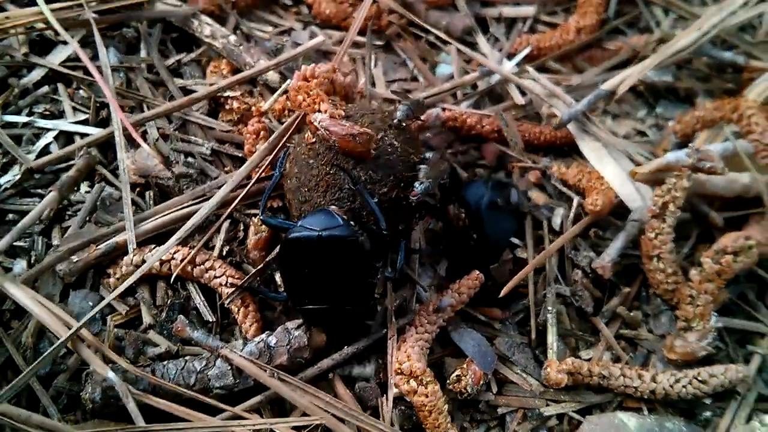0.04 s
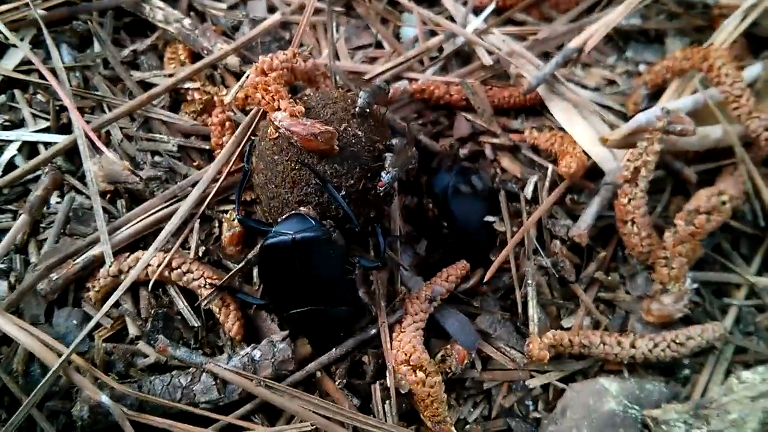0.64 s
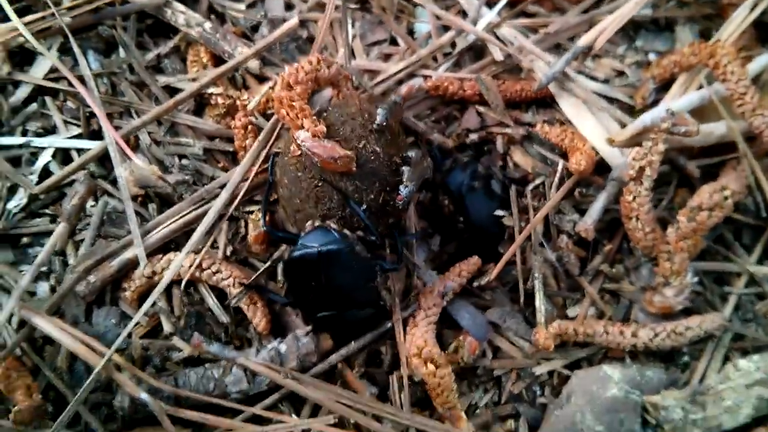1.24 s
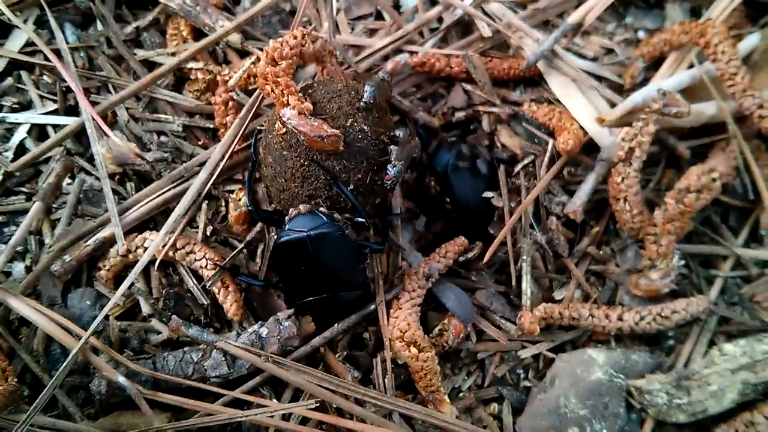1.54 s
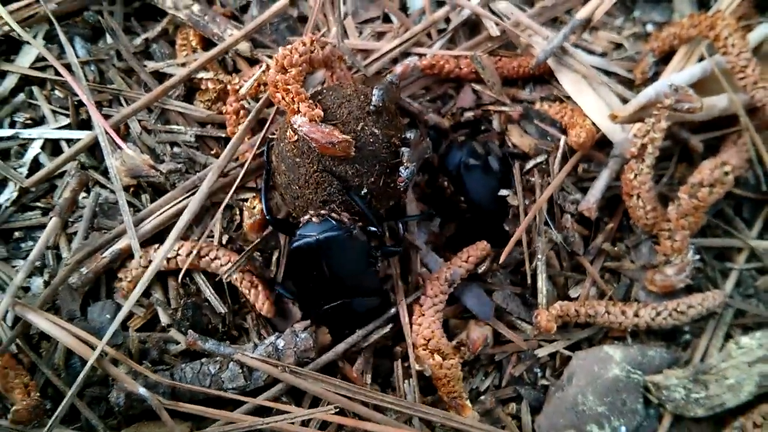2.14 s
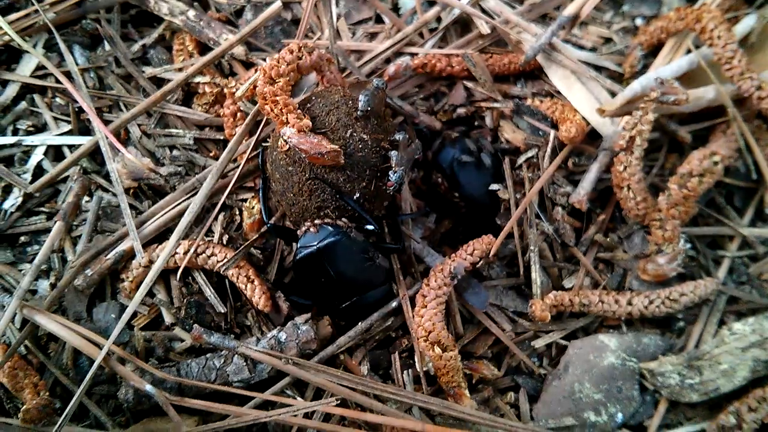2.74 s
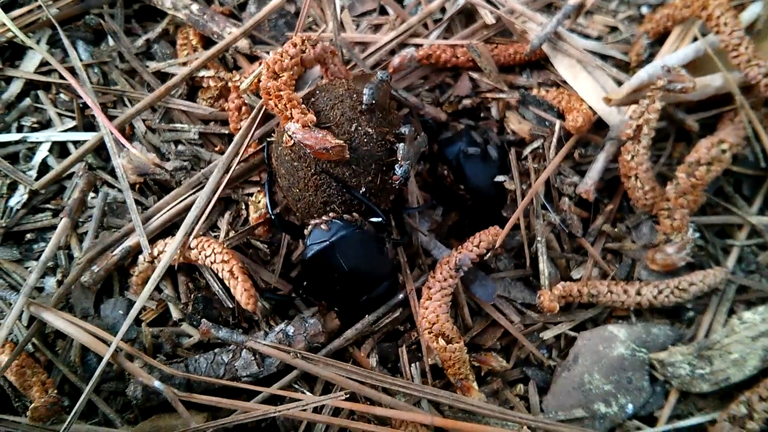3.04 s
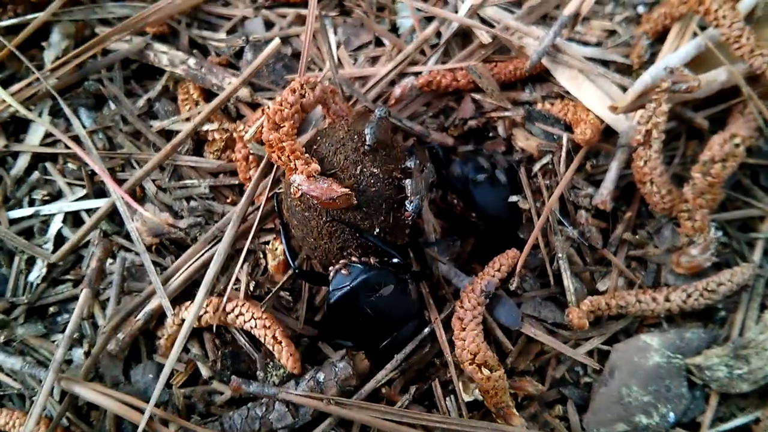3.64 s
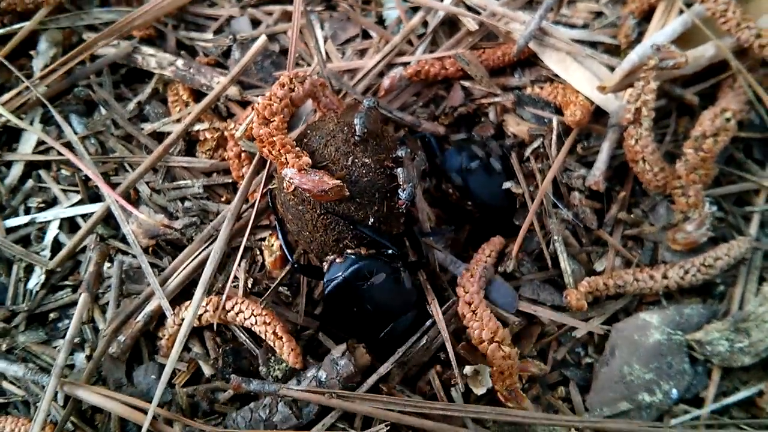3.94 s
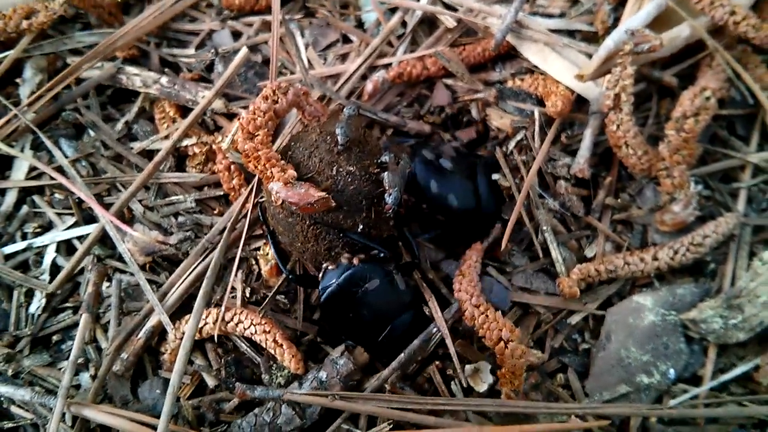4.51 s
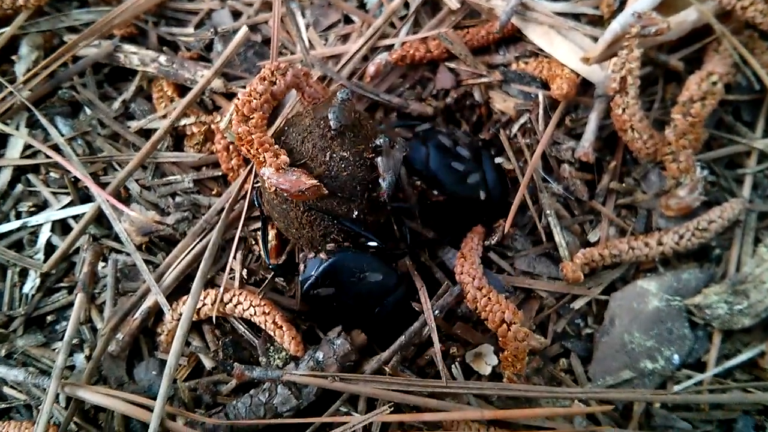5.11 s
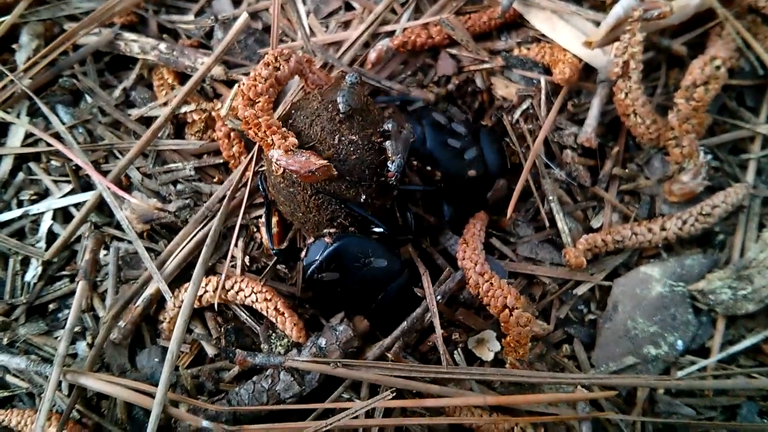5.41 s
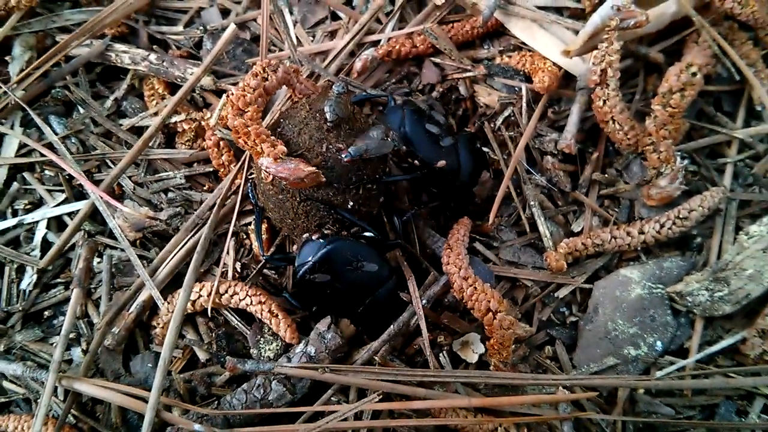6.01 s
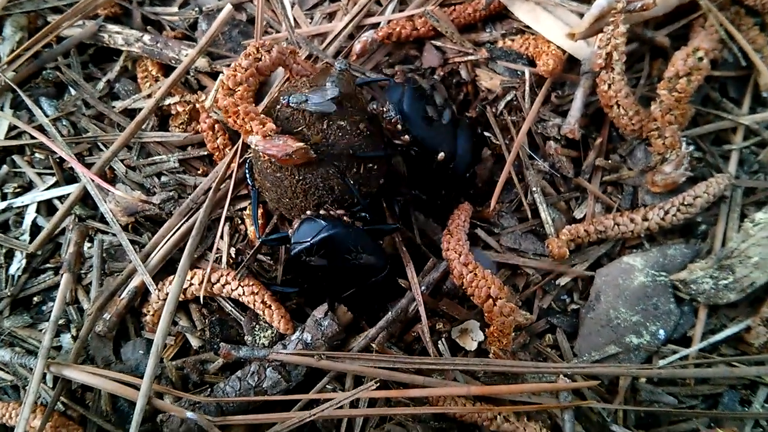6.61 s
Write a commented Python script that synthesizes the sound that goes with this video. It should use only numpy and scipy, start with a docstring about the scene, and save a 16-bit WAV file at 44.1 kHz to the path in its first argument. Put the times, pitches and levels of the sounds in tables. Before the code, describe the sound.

Heard from very close on a forest floor, dry needles tap, crack and hiss as beetles shift a dung ball. The loudest snaps come early in a rapid burst. Scattered clicks follow, then the litter sags under the rolling ball in a dense run of low, crackling thuds. The ending is quiet, with soft sliding needles, faint outdoor air and a barely audible thin whine.

```python
"""On dry pine litter outdoors, one microphone very close to two beetles pushing a ball of dung.
Needles knock as they spring free, snap as they break and hiss as they slide over each other.
The mat sags under the ball in dull, crunching thuds that run together as it rolls.
Behind them lie a fine high rustle, quiet air and, later, a thin steady whine."""
import sys
import numpy as np
from scipy import signal
from scipy.fft import rfft, irfft
from scipy.io import wavfile

SR = 44100
rng = np.random.default_rng(int(sys.argv[2]) if len(sys.argv) > 2 else 0)


def digitize_waveform(pressure):
    """Quantize a signal to 16-bit integers and store it at the path in sys.argv[1].

    Rows of a 2-D input are taken as channels; values are limited to [-1, 1].
    """
    field = np.atleast_2d(pressure).T
    bounded = np.clip(field, -1, 1)
    quanta = np.round(bounded * 32767).astype(np.int16)
    wavfile.write(sys.argv[1], SR, quanta)


N = 302511
TIME = np.arange(N) / SR


def amp(db):
    """Decibels to gain."""
    return 10 ** (np.asarray(db) / 20)


def unit(x):
    """Scales to rms 1."""
    return x / np.sqrt(np.mean(x ** 2) + 1e-20)


def add(mix, start_s, sound):
    """Mixes a sound in at start_s."""
    part = mix[max(round(start_s * SR), 0):][:len(sound)]
    part += sound[:len(part)]


def fader(levels):
    """Gain over time through rows of time_s, level_db."""
    return amp(np.interp(TIME, *np.transpose(levels)))


def resonate(x, hz, width_hz):
    """The part of a sound that one resonance passes."""
    return signal.lfilter(*signal.iirpeak(hz, hz / width_hz, fs=SR), x)


def gains(colour, size):
    """Gain at each FFT bin for a colour given as rows of freq_hz, level_db."""
    hz, db = np.transpose(colour)
    return amp(np.interp(np.log(np.fft.rfftfreq(size, 1 / SR) + 1), np.log(hz), db))


def noise(colour):
    """Steady noise of a given colour, rms 1."""
    return unit(irfft(rfft(rng.standard_normal(N)) * gains(colour, N), N))


def click(colour, size=512):
    """The sharpest causal pulse of a given colour, energy 1."""
    cepstrum = irfft(np.log(gains(colour, size)))
    cepstrum[1:size // 2] *= 2
    cepstrum[size // 2 + 1:] = 0
    pulse = irfft(np.exp(rfft(cepstrum)))
    return pulse / np.linalg.norm(pulse)


def drift(per_s):
    """A random wander with per_s turning points a second, rms 1."""
    knots = rng.standard_normal(N // 16)
    return unit(np.interp(TIME * per_s, np.arange(len(knots)), knots))


def ticks(per_s):
    """Impulses of random size at random moments."""
    return rng.standard_normal(N) * (rng.random(N) < per_s / SR)


def flex(hz, crest, steep, bend, settle):
    """A heavily damped bending wave: its fast part arrives first, so the pitch falls."""
    cycles = TIME[:SR // 20] * hz  # crest, bend and settle also count in cycles
    swell = (cycles / crest * np.exp(1 - cycles / crest)) ** steep
    return swell * np.sin(2 * np.pi * (cycles + bend * (1 - np.exp(-cycles / settle))))


def fractures(decay_s, rise_s, spread_db, linger, span_s):
    """A dying shower of tiny uneven breaks, with the energy of rms 1 held for span_s."""
    t = TIME[:SR // 25]
    sizes = rng.standard_normal(len(t)) * amp(spread_db * np.clip(rng.standard_normal(len(t)), -2, 2))
    shower = sizes * (1 - np.exp(-t / rise_s)) * (np.exp(-t / decay_s) + linger * np.exp(-t / 0.027))
    return shower / np.linalg.norm(shower) * np.sqrt(span_s * SR)


# Outdoor air around the microphone: freq_hz, level_db
AIR_COLOUR = [(20, -26), (60, -4), (130, 3.5), (280, -4.5), (520, -2), (820, -16), (1050, -7), (1400, -9),
              (1650, -24.5), (2050, -15.5), (2500, -23), (3000, -27), (4500, -22.5), (16000, -39)]
# The low stir of air and ground: time_s, level_db
STIR_LEVELS = [(0, -60.5), (1.6, -59), (2.5, -69), (3.1, -66), (4.45, -61), (5.1, -71.5), (6, -66),
               (6.86, -63.5)]
# The mat trembling after a thud: freq_hz, level_db
TREMBLE_COLOUR = [(30, -12), (90, 1), (170, -1), (300, -5.5), (600, -11.5), (1500, -25), (3000, -32)]


def stir(ticks_per_s=28, settling_db=-13, tremble_db=-30):
    """Quiet air, faint knocks of settling litter, and the mat trembling after each thud."""
    faint_knock = flex(372, crest=0.46, steep=0.62, bend=0.28, settle=0.31)
    settling = unit(signal.oaconvolve(ticks(ticks_per_s), faint_knock)[:N])
    air = noise(AIR_COLOUR) * amp(3.1 * drift(per_s=39))
    tremble = amp(tremble_db) * unrest() * noise(TREMBLE_COLOUR)
    return fader(STIR_LEVELS) * (air + amp(settling_db) * settling) + tremble


# Bright rustle, lower hiss and the broader hiss of a sliding needle: freq_hz, level_db
BRIGHT_COLOUR = [(3000, -34), (5800, -12), (7000, -1), (8200, -0.5), (9500, -6.5), (11000, -11),
                 (13000, -13), (16000, -19)]
LOW_COLOUR = [(1500, -4.5), (3000, -19), (3800, -13), (4800, -5), (5800, 6.5), (6800, 4.5), (8000, -16),
              (16000, -33)]
SLIDE_COLOUR = [(1000, -12.5), (2100, -2.5), (2900, -25), (3800, -8), (5600, -0.5), (6500, -5.5),
                (8200, -1), (9800, -7), (11500, -15.5), (16000, -22)]
# The bright rustle dies away once the ball stops, the lower hiss stays: time_s, level_db
BRIGHT_LEVELS = [(0, -66), (1.1, -67.5), (2.4, -62.5), (2.9, -65), (4.35, -62), (4.9, -73.5), (6.86, -79)]
LOW_LEVELS = [(0, -76), (1.8, -71), (3.1, -77), (4.0, -74.5), (6.86, -71)]
# Needles slide over each other and come to rest: start_s, level_db, decay_s, centre_hz
SLIDES = [(.015, -48, 0.087, 8250), (.802, -57.5, 0.25, 8150), (1.937, -46.5, 0.014, 8400),
          (2.233, -49, 0.051, 8350), (4.8, -67.5, 0.074, 7200), (5.1, -68.5, 0.17, 6730),
          (5.81, -66, 0.076, 6200), (6.12, -65, 0.088, 6400), (6.391, -60, 0.12, 6000),
          (6.599, -64, 0.049, 5900)]


def rustle(ticks_per_s=35, slide_q=5, unrest_db=-41.5):
    """Countless needles rub: a bright hiss with tiny ticks and a lower hiss, flaring where they slide."""
    ticking = unit(signal.oaconvolve(ticks(ticks_per_s), click(BRIGHT_COLOUR))[:N])
    bright = fader(BRIGHT_LEVELS) * (noise(BRIGHT_COLOUR) + amp(-9.5) * ticking)
    low_gain = np.hypot(fader(LOW_LEVELS), amp(unrest_db) * unrest())
    rubbing = noise(SLIDE_COLOUR)
    slides, t = np.zeros(N), TIME[:SR // 2]
    for start_s, db, decay_s, hz in SLIDES:
        broad = np.roll(rubbing, -round(start_s * SR))[:len(t)]
        slide = unit(unit(resonate(broad, hz, hz / slide_q)) + amp(-2.5) * broad)
        add(slides, start_s, amp(db) * slide * (1 - np.exp(-t / 0.0037)) * np.exp(-t / decay_s))
    grain = amp(0.99 * drift(per_s=310) + 0.69 * drift(per_s=29))
    return grain * (bright + low_gain * noise(LOW_COLOUR) + slides)


# A scraped needle sings faintly at its modes: pitch_hz, width_hz, level_db
SCRAPE_MODES = [(1080, 500, -4.5), (2130, 380, -6), (6860, 300, -4), (7670, 150, 3.5), (8060, 240, 2),
                (12990, 280, -10)]


def scrape(loudest_s=1.5, rise_s=0.1238, fall_s=0.15, level_db=-46, hiss_db=-3.5, grain_db=2):
    """One longer scrape: grainy friction swells and fades, hissing and ringing the needle's modes."""
    friction = rng.standard_normal(N)
    ring = sum(amp(db) * unit(resonate(friction, hz, width_hz)) for hz, width_hz, db in SCRAPE_MODES)
    from_peak = np.maximum((loudest_s - TIME) / rise_s, (TIME - loudest_s) / fall_s)
    swell = amp(level_db + grain_db * drift(per_s=450)) * np.exp(-from_peak ** 1.4)
    return swell * (unit(ring) + amp(hiss_db) * noise(BRIGHT_COLOUR))


# Dry fibres break close to the microphone: start_s, level_db, relative_ring_db
SNAPS = [(.957, -38, -25), (1.1396, -44, -21), (1.3616, -42.5, -26), (1.4705, -38, -24), (1.5159, -33, -14),
         (1.5508, -31, -13), (1.5948, -31.5, -16), (1.6359, -29.5, -5), (1.678, -44, -24),
         (1.6814, -32.5, -22), (1.7449, -31.5, -0.5), (1.905, -31.5, -8.5), (2.66, -28, -3.5),
         (3.256, -35.5, -8), (3.632, -46, -9), (3.7816, -35, -12), (3.8517, -40, -9), (3.9478, -37.5, -6),
         (4.2872, -41.5, -8), (4.3565, -29, -14), (4.62, -52.5, -2)]
# The crack of a break: freq_hz, level_db
CRACK_COLOUR = [(120, -13.5), (350, 9), (700, 0), (1700, -4.5), (2300, -5.5), (3000, -7), (4200, -4),
                (7500, 5.5), (10000, -1), (13000, -2.5), (16000, -12)]
# The close pair of tones that rings after a snap: pitch_hz, level_db, t60_s
SNAP_RING_MODES = [(4033, -1.5, 0.026), (3820, -11, .024)]


def snaps(glide_hz=5500, glide_s=0.00045, chirp_s=0.00019):
    """A sharp break sprays splinters; each snap chirps down to a brief, beating ring near 4 kHz."""
    breaks, rings = np.zeros((2, N))
    t = TIME[:SR // 30]
    for (start_s, db, ring_db), detune in zip(SNAPS, rng.standard_normal(len(SNAPS))):
        splinters = fractures(decay_s=0.00043, rise_s=0.000067, spread_db=-3, linger=0.025, span_s=0.0019)
        add(breaks, start_s, amp(db + 14) * np.ones(1))
        add(breaks, start_s, amp(db - 1) * splinters)
        for mode_hz, mode_db, t60_s in SNAP_RING_MODES:
            hz = mode_hz * (1 + 0.022 * detune) + glide_hz * np.exp(-t / glide_s)
            fade = amp(-2.5) * np.exp(-t / chirp_s) + amp(ring_db - 60 * t / t60_s)
            add(rings, start_s, amp(db + mode_db) * fade * np.sin(2 * np.pi * np.cumsum(hz) / SR))
    return signal.oaconvolve(breaks, click(CRACK_COLOUR))[:N] + rings


# The litter gives way under the ball: start_s, level_db, crackle_db
THUDS = [(0.2304, -45, -60.5), (0.3174, -47, -58.5), (.389, -44.5, -52.5), (0.4428, -41.5, -57.5),
         (0.5441, -39, -50.5), (.609, -43, -56.5), (.6747, -46, -52), (.721, -38, -53), (.955, -31, -37),
         (1.007, -33.5, -47.5), (1.1764, -33.5, -49), (1.23, -27.5, -46.5), (1.2752, -27, -42),
         (1.354, -25.5, -39), (2.1194, -30, -46), (2.1953, -38, -65), (3.0771, -29.5, -46.5),
         (3.174, -31, -54.5), (3.242, -31.5, -55), (3.287, -44, -57), (3.3178, -33, -56),
         (3.3635, -33, -59), (3.3986, -33.5, -60.5), (3.4323, -31, -57.5), (3.4722, -32, -59.5),
         (3.4977, -33, -54), (3.522, -26.5, -56), (3.5452, -26, -56.5), (3.5662, -27, -56),
         (3.5895, -26, -53), (3.624, -24.5, -48.5), (3.653, -25.5, -49), (3.6768, -25, -48),
         (3.708, -24.5, -49.5), (3.7406, -24.5, -45.5), (3.776, -26.5, -47.5), (3.8035, -26, -48),
         (3.844, -25.5, -43.5), (3.8902, -25, -44), (3.939, -24, -44), (3.981, -24, -45),
         (4.0259, -26.5, -45), (4.0873, -24, -40), (4.1174, -24.5, -46), (4.2237, -25.5, -42.5),
         (4.2751, -24.5, -46), (4.3176, -24, -46.5), (4.35, -23, -38), (4.3766, -25.5, -45)]
# Crisp crackle and dull crunch of fibres in the mat: freq_hz, level_db
CRACKLE_COLOUR = [(1500, -108), (3000, -14), (3600, -6.5), (4400, -11.5), (5800, -3.5), (8000, 5),
                  (9300, 4.5), (10000, 1), (11000, -2), (12200, -9.5), (16000, -13)]
CRUNCH_COLOUR = [(150, -24), (420, 9), (700, 2.5), (1100, 3), (1650, -8.5), (2100, -4), (2800, -16),
                 (5000, -81)]


def thuds(base_hz=99, octaves_per_db=0.0004, loose_until_s=1.2, sway_below_hz=19, sway_s=0.014):
    """The mat of needles sags and sways on while fibres in it crackle and crunch."""
    mat, crisp, dull = np.zeros((3, N))
    t = TIME[:SR // 8]
    for (start_s, db, crackle_db), detune in zip(THUDS, rng.standard_normal(len(THUDS))):
        hz = base_hz * 2 ** (octaves_per_db * (db + 25.5))  # pressed harder, the mat is stiffer
        if start_s < loose_until_s:
            hz *= 0.82  # it sags more slowly before the ball packs it
        sag = flex(hz, crest=0.32, steep=1.08, bend=0.94, settle=0.34)
        add(mat, start_s + 0.00053, amp(db - 1.1) * sag)  # just after the first fibres break
        sway = np.sin(2 * np.pi * (hz - sway_below_hz) * (1 + 0.14 * detune) * t)
        sway *= (90 / hz) ** 3  # a softer spot sways slower and further
        sway *= (1 - np.exp(-t / 0.0075)) * np.exp(-t / sway_s)
        add(mat, start_s + 0.0081, -amp(db - 11) * sway)
        crackle = fractures(decay_s=0.0034, rise_s=0.00041, spread_db=6.5, linger=0.014, span_s=0.0098)
        crunch = fractures(decay_s=0.0041, rise_s=0.00065, spread_db=5, linger=0.048, span_s=0.013)
        crunch_db = db - 7.5 + 0.61 * (crackle_db - db)  # follows both thud and crackle
        add(crisp, start_s, amp(crackle_db) * crackle)
        add(dull, start_s, amp(crunch_db) * crunch)
    crackles = signal.oaconvolve(crisp, click(CRACKLE_COLOUR))[:N]
    crunches = signal.oaconvolve(dull, click(CRUNCH_COLOUR))[:N]
    return mat + crackles + crunches


def unrest(decay_s=0.11):
    """Strength of the litter's trembling and rustling: each thud adds to it, and it dies away."""
    power = np.zeros(N)
    for start_s, db, _ in THUDS:
        add(power, start_s, (amp(db) * np.exp(-TIME[:SR] / decay_s)) ** 2)
    return np.sqrt(power)


def flurry(start_s=1.28, end_s=1.352, per_s=95, level_db=-34, scatter_db=2):
    """Faint knocks crowd together as the ball strains: rows of start_s, level_db."""
    times = start_s + (np.arange(40) + rng.random(40)) / per_s
    levels = level_db + scatter_db * rng.standard_normal(40)
    return [(s, db) for s, db in zip(times, levels) if s < end_s]


# Needles spring free and knock on the litter, right at the microphone: start_s, level_db
KNOCKS = [(0.1446, -27.5), (.161, -36.5), (.1751, -32.5), (0.249, -25.5), (0.3653, -37.5), (0.4045, -29),
          (0.6623, -27), (0.6774, -35), (.6945, -25.5), (0.8338, -25.5), (.8748, -26), (0.9114, -21),
          (.945, -28), (.9585, -27), (1.0692, -30.5), (1.1386, -32), (1.1904, -30.5), (1.209, -31.5),
          (1.2542, -25.5), (1.2649, -21.5), (1.2695, -28), (1.2895, -30), (1.3613, -18.5), (1.391, -29.5),
          (1.41, -22.5), (1.4248, -24.5), (1.4342, -25), (1.472, -11.5), (1.5145, -12.8), (1.5488, -12.5),
          (1.5922, -15.5), (1.6347, -12.5), (1.6775, -16), (1.7455, -18.5), (1.9041, -18), (2.6589, -23),
          (3.257, -30), (3.6324, -25), (3.6851, -22), (3.782, -24.5), (3.852, -25), (3.9483, -28.5),
          (4.2431, -31), (4.287, -22), (4.3557, -24.5), (4.5407, -38), (4.62, -33), (5.2063, -48.5),
          (6.146, -42), (6.473, -40.5), (6.7183, -47.5)]
# A middling knock, low while the ball weighs on the needles: time_s, pitch_hz
KNOCK_PITCH = [(0.1, 570), (1.2, 605), (1.34, 770), (1.9, 730), (2.66, 317), (3.26, 410), (3.6, 260),
               (4.4, 275), (4.62, 810), (6.5, 556)]


def knocks(middling_db=-25, octaves_per_db=0.0355, litter_hz=289):
    """Each needle gives one short swing, with a slower push and uneven rebound from the hollow litter."""
    out = np.zeros(N)
    push = flex(litter_hz, crest=0.57, steep=2.16, bend=0.14, settle=0.5)
    for (late, strong, blunt), (start_s, db) in zip(rng.standard_normal((100, 3)), [*KNOCKS, *flurry()]):
        hz = np.interp(start_s, *np.transpose(KNOCK_PITCH))
        hz *= 2 ** (octaves_per_db * (db - middling_db))  # a harder knock rings higher
        swing = -amp(db - 1.5) * flex(hz, crest=0.44, steep=2.3 * np.exp(0.15 * blunt),
                                      bend=0.19, settle=0.49)
        rebound = amp(-13.5 + 2 * strong) * swing
        add(out, start_s, swing)
        add(out, start_s + 0.00213 + 0.00048 * late, rebound)
        add(out, start_s, amp(db - 16.5) * push)
    hollow = amp(-6) * resonate(out, hz=720, width_hz=170)
    # so light a thing moves no bass
    return signal.sosfilt(signal.butter(2, 195, "highpass", fs=SR, output="sos"), out + hollow)


def scene():
    """The litter from very close, in mono and without reverberation."""
    return (knocks() + thuds() + snaps() + rustle() + scrape() + stir())[None]


def record(dry, bass_hz=28, top_hz=16200, hiss_db=-72.5, whine_hz=15000, whine_db=-77.5, whine_from_s=4.2):
    """The microphone's mid dip, bass roll-off and hiss, a thin whine that sets in, and the band limit."""
    dipped = dry - 0.48 * resonate(dry, hz=3000, width_hz=900)
    rolled_off = signal.sosfilt(signal.butter(2, bass_hz, "highpass", fs=SR, output="sos"), dipped)
    whine = amp(whine_db) * np.sqrt(2) * np.sin(2 * np.pi * whine_hz * TIME) * (TIME > whine_from_s)
    hiss = amp(hiss_db) * noise([(100, 2), (2000, -5.5), (3100, -10.5), (6000, -11), (16000, -1.5)])
    low_pass = signal.firwin(255, top_hz, window=("kaiser", 8), fs=SR)
    return signal.oaconvolve(rolled_off + whine + hiss, low_pass[None], "same")


dry = scene()
out = record(dry)
digitize_waveform(out)
```